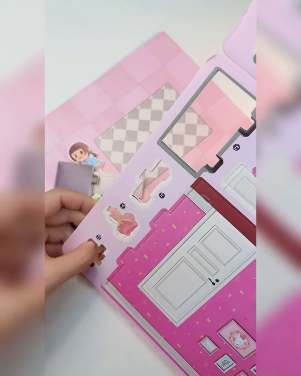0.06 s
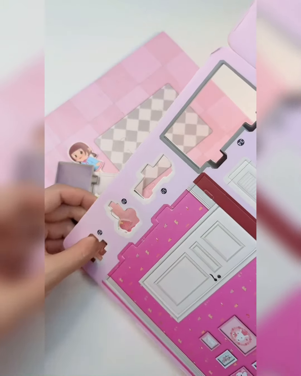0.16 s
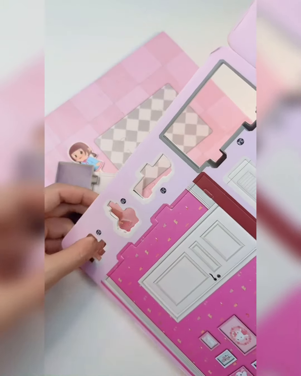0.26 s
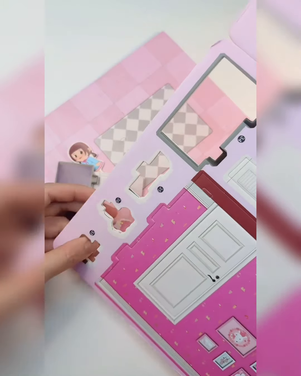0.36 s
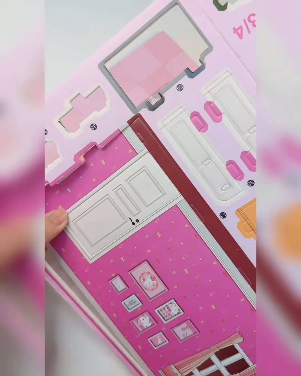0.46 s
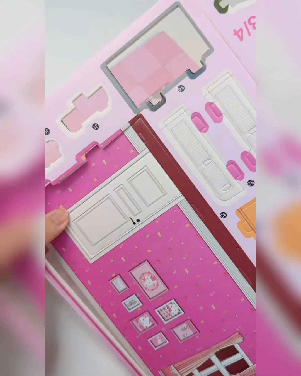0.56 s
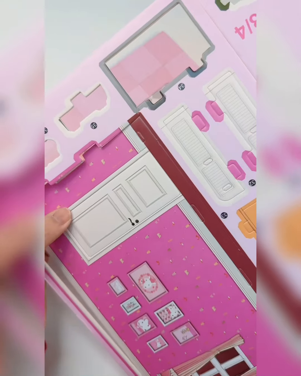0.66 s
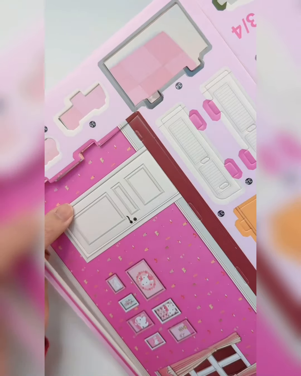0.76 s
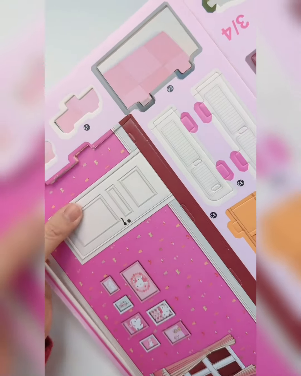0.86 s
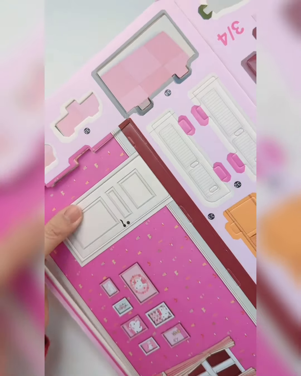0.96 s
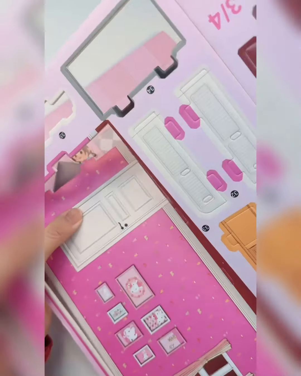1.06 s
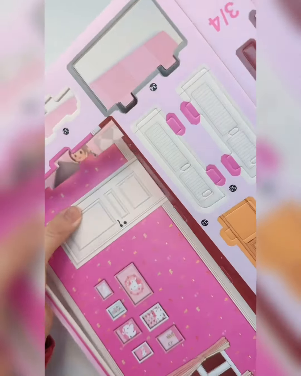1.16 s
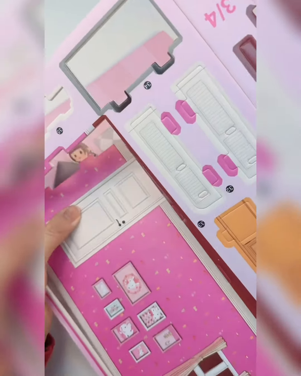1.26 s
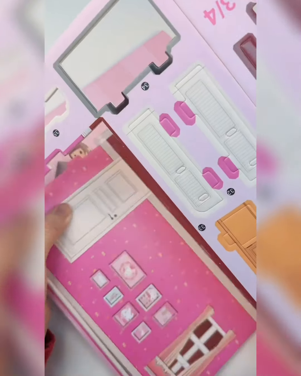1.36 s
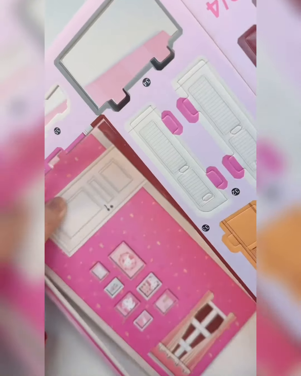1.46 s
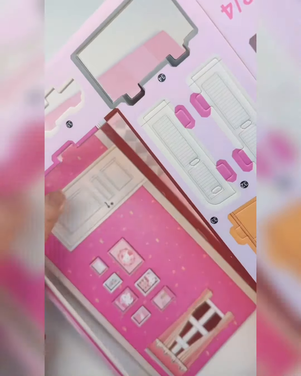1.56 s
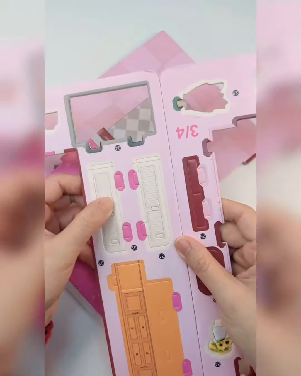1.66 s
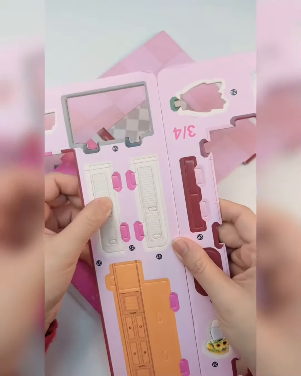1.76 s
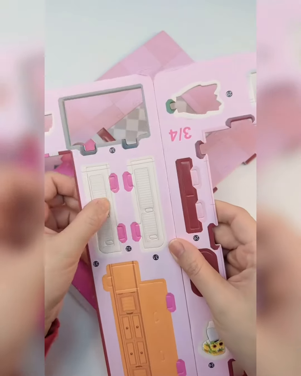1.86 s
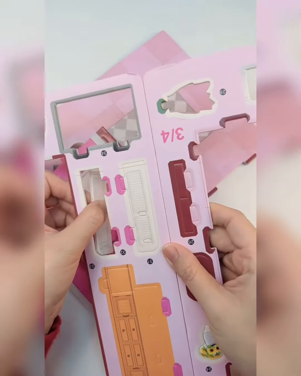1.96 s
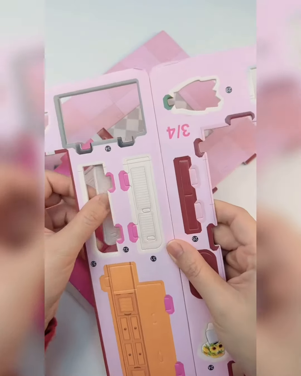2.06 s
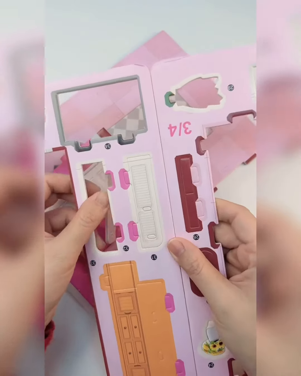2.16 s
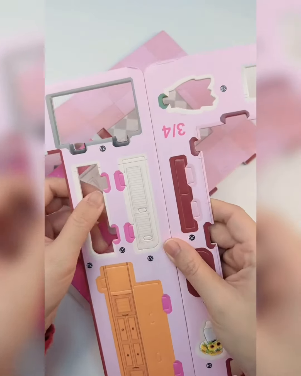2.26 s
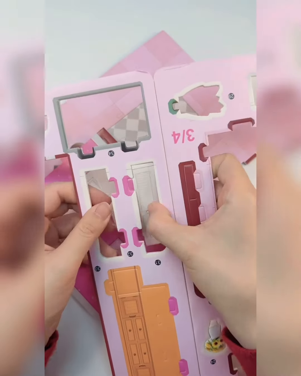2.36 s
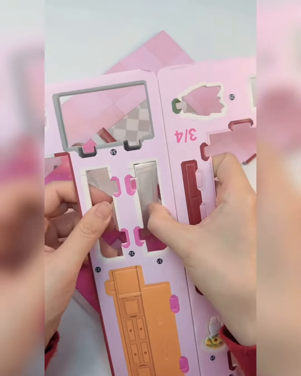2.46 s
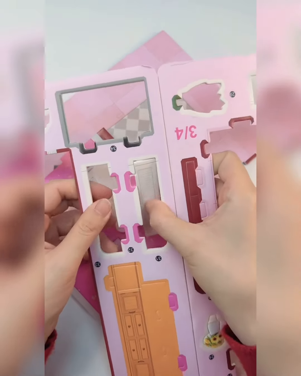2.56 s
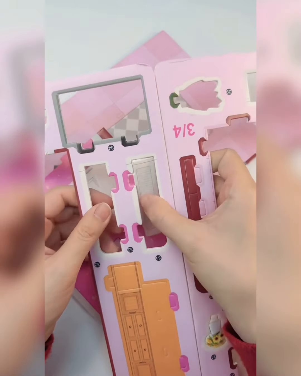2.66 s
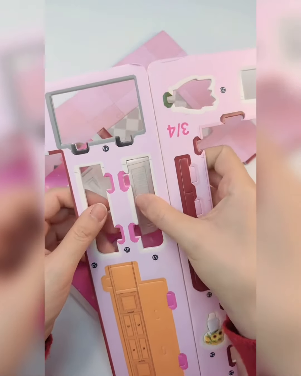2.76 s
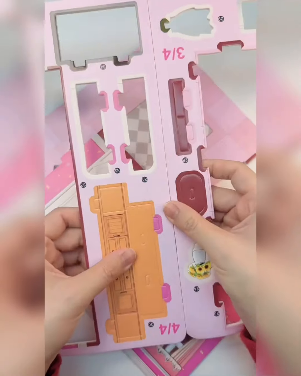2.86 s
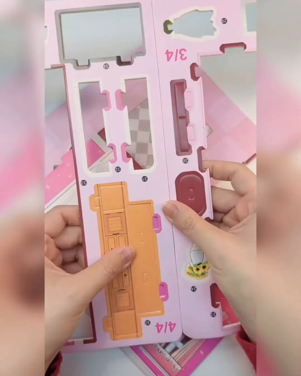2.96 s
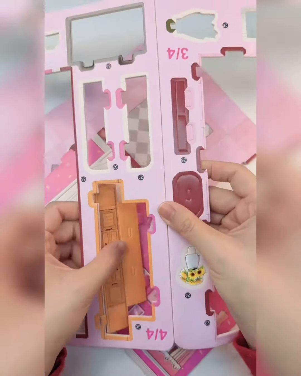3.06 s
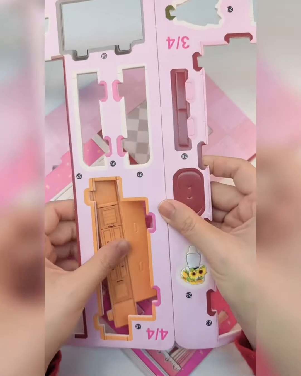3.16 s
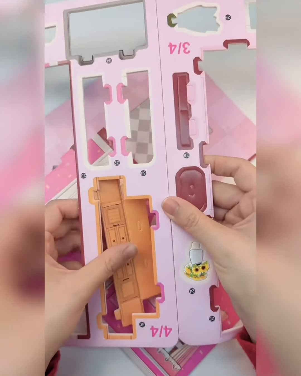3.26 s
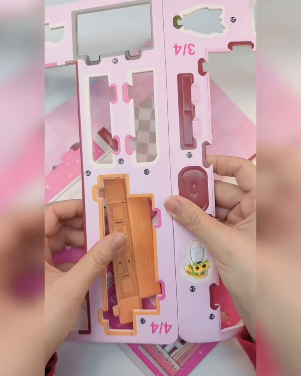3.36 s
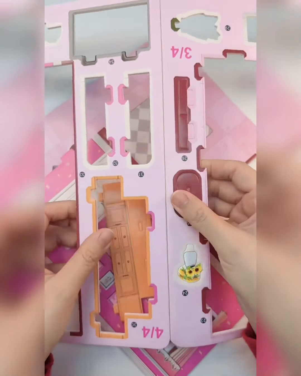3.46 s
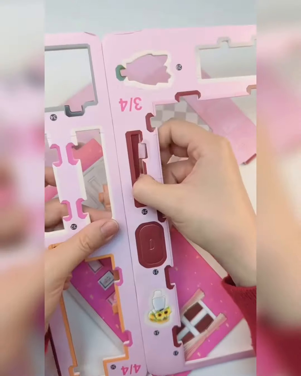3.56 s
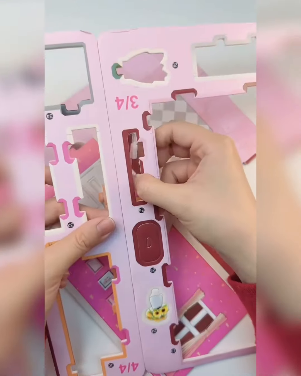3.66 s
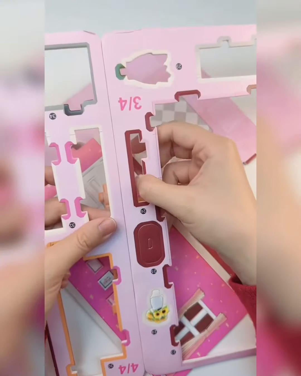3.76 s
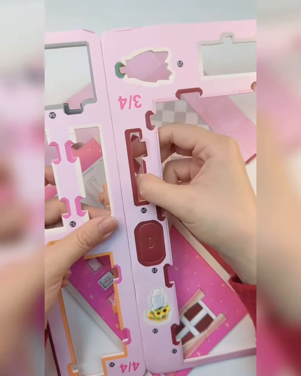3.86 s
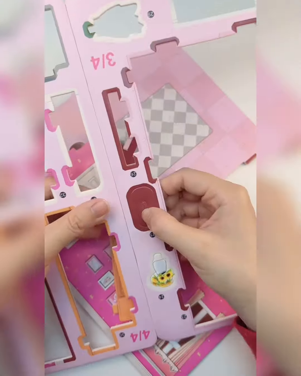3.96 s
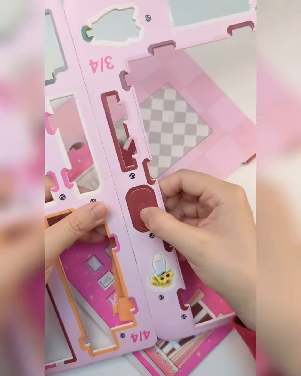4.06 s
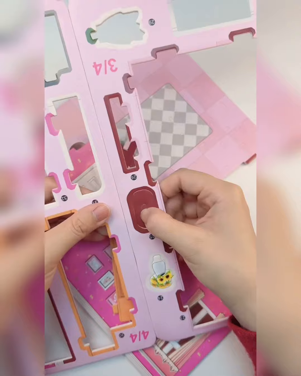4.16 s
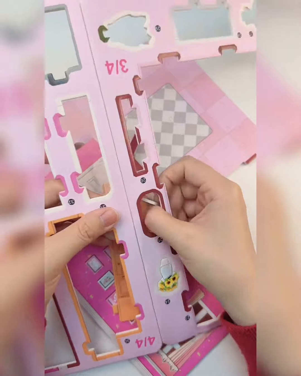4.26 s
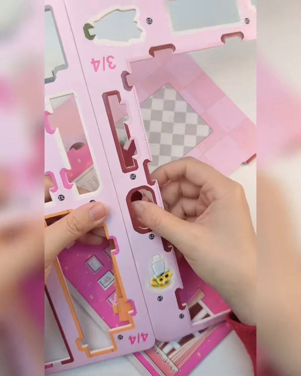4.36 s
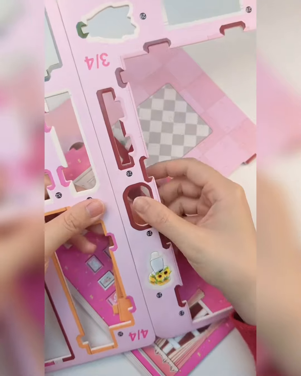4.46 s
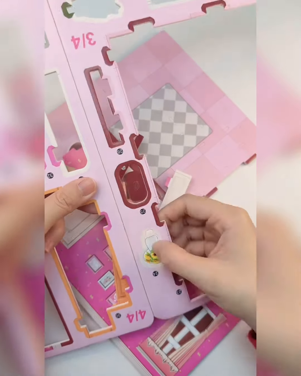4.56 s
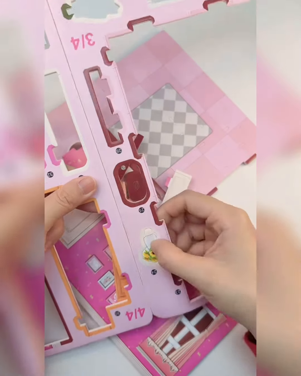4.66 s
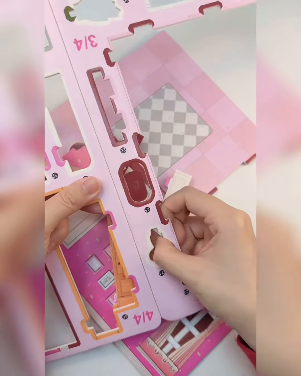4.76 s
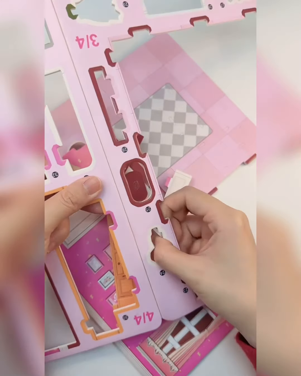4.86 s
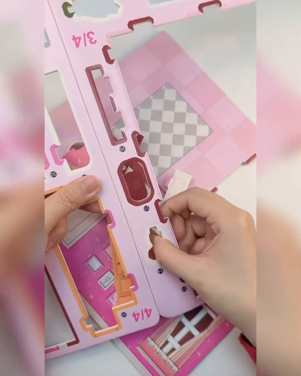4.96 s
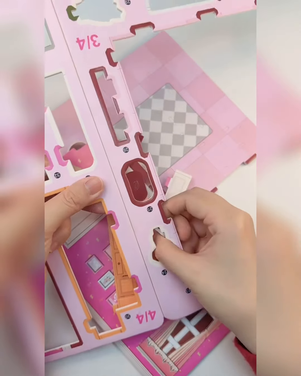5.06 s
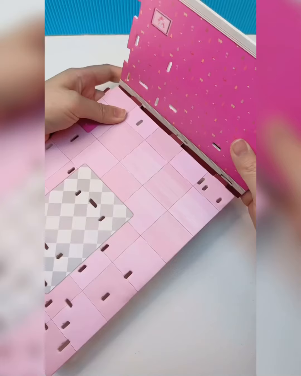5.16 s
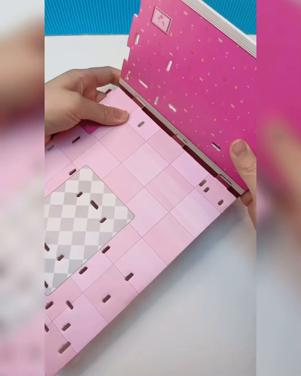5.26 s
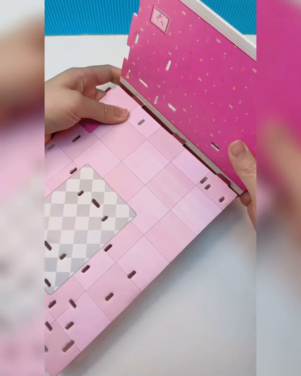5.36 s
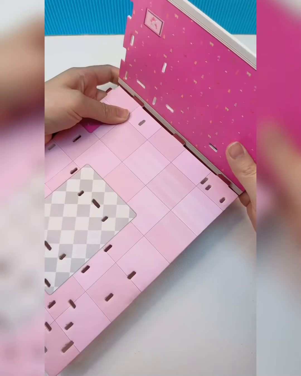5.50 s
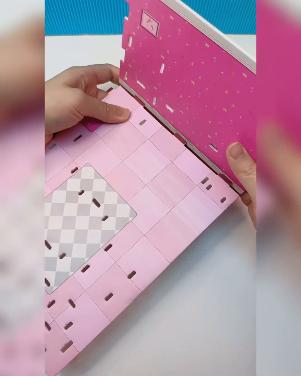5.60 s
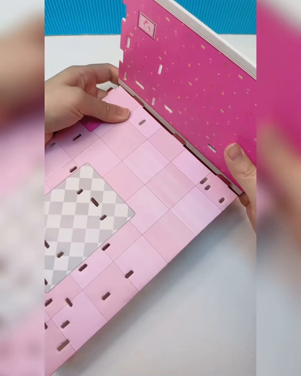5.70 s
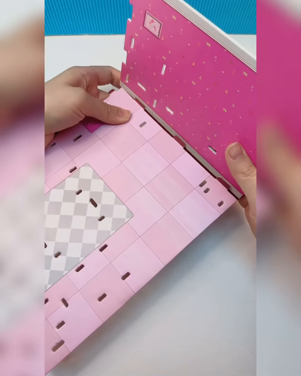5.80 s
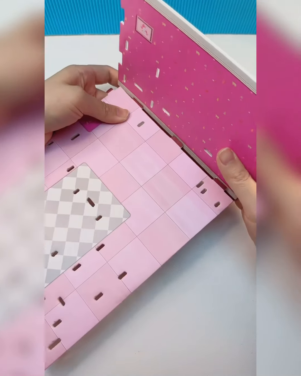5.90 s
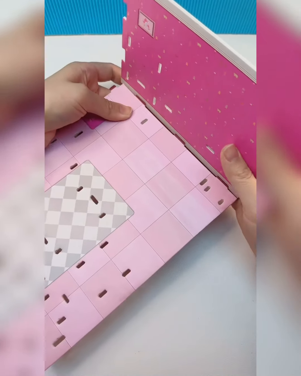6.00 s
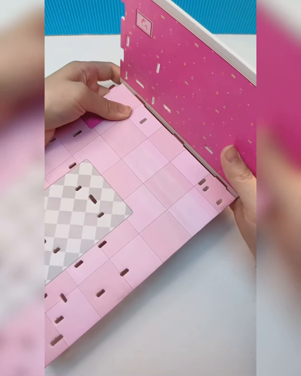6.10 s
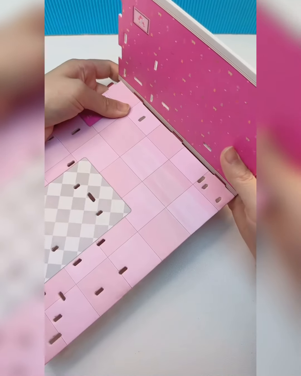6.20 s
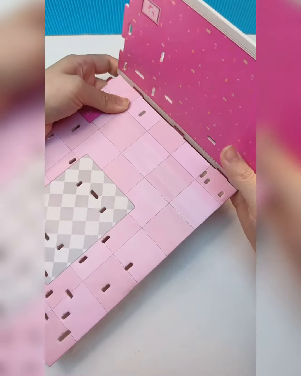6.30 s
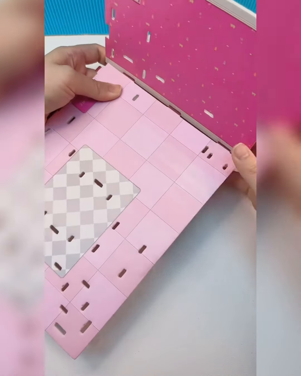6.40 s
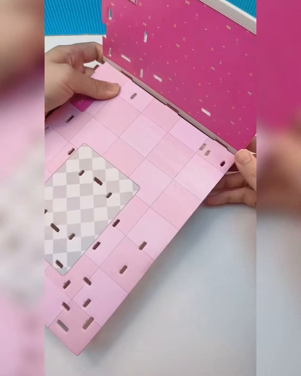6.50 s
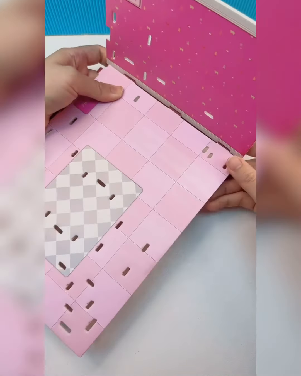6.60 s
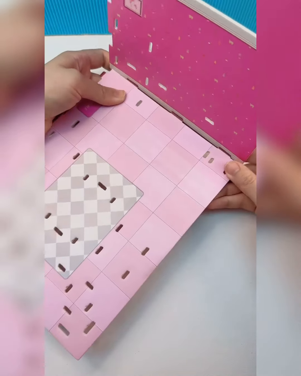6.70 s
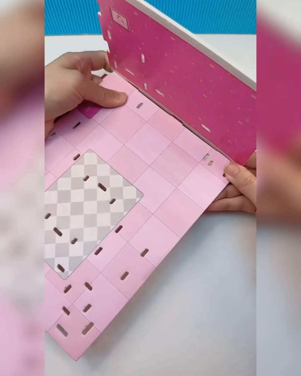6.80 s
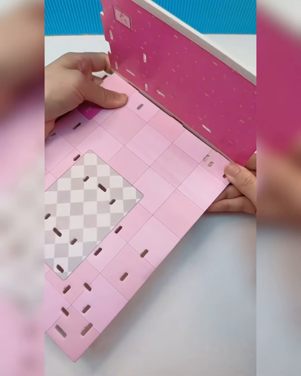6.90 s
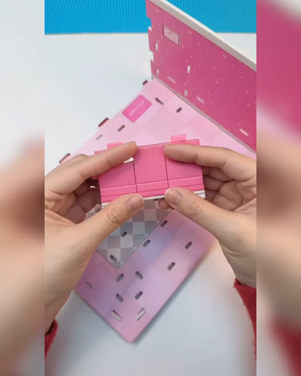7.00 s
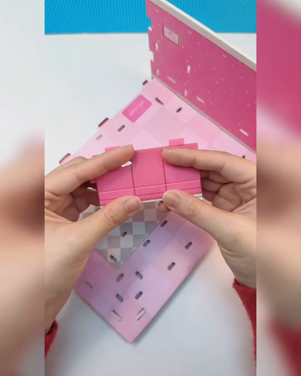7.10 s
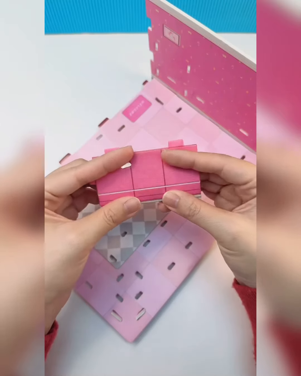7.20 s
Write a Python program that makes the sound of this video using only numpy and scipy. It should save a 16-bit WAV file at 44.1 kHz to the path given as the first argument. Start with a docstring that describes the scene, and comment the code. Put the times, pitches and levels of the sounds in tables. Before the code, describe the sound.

Close, dry paper snaps and knocks as thin card parts are punched free, followed by quieter scraping while two panels are fitted together.

```python
"""Punching out a cardboard kit

Over a table in a small room, close to one microphone, hands press die-cut pieces from thin card.
Paper bridges tear in clusters of snaps (fibre noise through the card's resonances), the sheet flexes
and slides (stick-slip noise), loose pieces drop (short knocks and low decaying swings).
Then the tabs of a wall scrape and click into a floor panel, over finger rub and a low room rumble."""
import sys
import numpy as np
from scipy import signal
from scipy.fft import rfft, irfft
from scipy.io import wavfile
from scipy.ndimage import uniform_filter1d

SR = 44100
rng = np.random.default_rng(int(sys.argv[2]) if len(sys.argv) > 2 else 0)


def log_audio(samples):
    """Write samples as a 16-bit WAV file to the path given in sys.argv[1]."""
    # one column per channel
    frames = np.atleast_2d(samples).T
    # limit to full scale, then quantise
    limited = np.clip(frames, -1, 1)
    pcm = np.round(limited * 32767).astype(np.int16)
    wavfile.write(sys.argv[1], SR, pcm)


N = 319284
TIME = np.arange(N) / SR


def from_db(db):
    """Decibels to gain."""
    return 10 ** (np.asarray(db) / 20)


def rms_one(x):
    """Scale to unit rms."""
    return x / np.sqrt(np.mean(x ** 2) + 1e-20)


def in_time(rows):
    """Each column of a curve, interpolated at every sample."""
    s, *columns = np.transpose(rows)
    return [np.interp(TIME, s, column) for column in columns]


def add(out, s, sound):
    """Mix a sound in, starting at time s; what falls outside the scene is left off."""
    at = int(round(s * SR))
    piece = sound[max(-at, 0):N - at]
    out[max(at, 0):max(at, 0) + len(piece)] += piece


def band_filter(low_hz, high_hz):
    """A Butterworth band-pass."""
    return signal.butter(3, [low_hz, high_hz], "band", fs=SR, output="sos")


def in_band(x, low_hz, high_hz):
    """One frequency range of a sound, at unit rms."""
    return rms_one(signal.sosfilt(band_filter(low_hz, high_hz), x))


def resonance(x, hz, width):
    """One two-pole resonance, gain about 1 on top."""
    r = np.exp(-np.pi * width / SR)
    numerator = np.array([1, 0, -1]) * (1 - r * r) / 2
    denominator = [1, -2 * r * np.cos(2 * np.pi * hz / SR), r * r]
    return signal.lfilter(numerator, denominator, x + 1e-18)


def resonances(x, modes):
    """Several resonances side by side, each at its own level."""
    return sum(from_db(db) * resonance(x, hz, width) for hz, width, db in modes)


def colour_response(points, size=2048):
    """Causal (minimum-phase) impulse response of a spectrum, by folding its cepstrum."""
    hz, db = np.transpose(points)
    grid = np.maximum(np.arange(size // 2 + 1) * SR / size, 1)
    gain = from_db(np.interp(np.log(grid), np.log(hz), db))
    cepstrum = irfft(np.log(gain))
    n = np.arange(size)
    fold = (n < size // 2) * np.minimum(n + 1, 2)
    return irfft(np.exp(rfft(cepstrum * fold)))


def through(x, response):
    """Pass a sound through an impulse response."""
    return signal.fftconvolve(x, response)[:len(x)]


def drift(per_s, count):
    """Random wander with unit rms."""
    steps = np.arange(count) * per_s / SR
    return rms_one(np.interp(steps, np.arange(count), rng.standard_normal(count)))


def fibres(count, grain_db):
    """Paper fibres letting go: dense tiny clicks of very uneven size."""
    sizes = from_db(grain_db * np.clip(rng.standard_normal(count), -2, 2))
    return rms_one(rng.standard_normal(count) * sizes)


def stick_slip(count, per_s, depth_db, uneven, jitter=.35):
    """Card catches and jumps unevenly: each jump starts sharply and dies away (negative depth: grows)."""
    jumps = np.cumsum(per_s * np.exp(jitter * drift(per_s, count))) / SR
    sizes = rng.uniform(-1.4, 1, count)[jumps.astype(int)]
    return from_db(depth_db * (uneven * sizes - jumps % 1))


# The colour of tearing card. Each row: frequency in Hz, level in dB.
SNAP_COLOUR = [(200, -7.5), (500, -7.5), (900, 0), (1500, 3), (2800, -3.5), (3300, -3.5), (4200, -4.5),
               (5500, -12.5), (7200, -11.5), (9500, -8.5), (12500, -10), (15500, -1.5)]
# A snap's flex, board, edge and fibre crack. Each row: low end in Hz, high end in Hz.
SNAP_BANDS = [(210, 789), (760, 2378), (2200, 6960), (8400, 15800)]


def snap_voice():
    """What all snaps share: the colour of the card and the filters of its four ranges."""
    return colour_response(SNAP_COLOUR), [band_filter(low, high) for low, high in SNAP_BANDS]


SNAP_LEAD_S = .01   # room for the strain to build before a snap
# a smaller piece rings higher, flexes less and sounds more from its edge
MIDDLE_RING_HZ, FLEX_DB_PER_OCTAVE, EDGE_DB_PER_OCTAVE = 1160, -12.5, 6
SECOND_MODE_RATIO, SECOND_MODE_DB = 2.1, -13   # the piece's second mode against its first


def snap(voice, hz, db, flex_db, edge_db, crack_db, strain_db, ring_db, tear_s=0.0021, size=2048):
    """The first fibres give under strain, then the card lets go; the piece rings briefly and flutters."""
    strain_s, flutter_s, flutter_db, ring_width_hz = 0.0022, 0.012, -18, 300
    colour, bands = voice
    rise_s = .27 * tear_s
    t = np.arange(size) / SR - SNAP_LEAD_S - rise_s
    before, after = np.maximum(-t, 0), np.maximum(t, 0)
    crackle = rms_one(stick_slip(size, per_s=330, depth_db=10.5, uneven=0.16))
    force = np.exp(-before / rise_s - after / tear_s)
    force = force + from_db(flutter_db) * crackle * np.exp(-before / rise_s - after / flutter_s)
    force = force + from_db(strain_db) * np.exp(-before / strain_s - after / tear_s)
    tear = through(force * fibres(size, grain_db=2.5), colour)
    first_mode = resonance(tear, hz, ring_width_hz)
    second_mode = from_db(SECOND_MODE_DB) * resonance(tear, SECOND_MODE_RATIO * hz, ring_width_hz)
    piece = tear + from_db(ring_db) * (first_mode + second_mode)
    octaves = np.log2(hz / MIDDLE_RING_HZ)
    flex = flex_db + FLEX_DB_PER_OCTAVE * octaves
    edge = edge_db + EDGE_DB_PER_OCTAVE * octaves
    gains = from_db(db + np.array([flex, 0, edge, crack_db]))
    span = np.sqrt(.01 * SR / size)   # each range's energy is referred to 10 ms
    return span * sum(g * rms_one(signal.sosfilt(band, piece)) for g, band in zip(gains, bands))


# Paper bridges. Each row: start in seconds, ring of the piece in Hz, level in dB before the trim,
# fibre crack against that level in dB before its trim, tearing time in seconds.
TEARS = [(0.0005, 3020, -22.5, 0.5, 0.0027), (0.0216, 1790, -34, 8.5, 0.0012),
         (1.0244, 1220, -25, -3.5, 0.0025), (1.374, 1550, -25.5, -17, 0.00064),
         (1.918, 1800, -24.5, -10, 0.0017), (1.9322, 1560, -19, -10.5, 0.001),
         (1.944, 1190, -20, -4.5, 0.001), (1.9481, 1230, -17, -8, 0.0011), (2.301, 1600, -18.5, -5, 0.0027),
         (2.3345, 920, -18.5, -10, 0.00066), (2.3491, 1140, -31, -2, .001), (2.356, 1660, -20, 0.5, .0023),
         (2.3827, 2850, -21.5, -4, 0.0019), (2.8849, 1203, -39.5, -7, 0.0011),
         (2.8886, 1200, -27.5, -11.5, 0.0017), (2.912, 1290, -26, -3, .0013),
         (2.919, 1600, -30, -7, 0.0017), (2.941, 1220, -24.5, -4, 0.002), (2.9478, 1480, -30, -11, 0.002),
         (3.0093, 1370, -23, -3.5, 0.0026), (3.012, 1270, -14.5, -19, 0.0014),
         (3.0186, 2290, -20, -11, 0.00077), (3.022, 1300, -19.5, -4.5, 0.0014),
         (3.0366, 1220, -29.5, -10, 0.002), (3.0441, 2204, -18, -6.5, 0.001),
         (3.5163, 1470, -28, 5, 0.00084), (3.535, 1450, -20.5, -5, 0.00071),
         (3.5502, 1430, -30.5, 5, 0.00049), (3.5599, 1390, -34.5, -5, 0.00068),
         (4.1962, 2060, -20.5, -11.5, 0.0017), (4.2033, 1380, -21.5, 0, 0.00088),
         (4.233, 1850, -22, 4, 0.0016), (4.246, 1750, -30, -13, 0.006), (4.71, 2480, -22.5, -0.5, 0.0035),
         (4.7178, 2630, -23.5, -2.5, 0.00031), (4.7242, 1940, -25, -4, 0.0019),
         (4.746, 1020, -31.5, 5, 0.0014)]
# The big wall flexes the sheet most, the small parts least. Each row: time in seconds,
# flex against the level in dB, top pitch of the recoil in Hz before it is drawn lower.
SHEET_FLEX = [(1.2, -1, 149), (1.93, -6.5, 160), (2.3, -9, 390), (2.4, -8.5, 393), (3.0, -13.5, 160),
              (3.53, -6, 260), (4.2, -16.5, 180), (4.7, -7.5, 170)]
EDGE_FOLLOWS_CRACK = 0.25   # a sharper tear is also louder at the edge: dB per dB


def tears(level_db=-2.0, edge_db=-5.5, fibre_db=1.5):
    """Each bridge breaks with a snap: short and hard, or drawn out into a brief rip."""
    out, voice = np.zeros(N), snap_voice()
    when, flexes, _ = np.transpose(SHEET_FLEX)
    for s, hz, db, crack, tear_s in TEARS:
        flex = np.interp(s, when, flexes)
        edge = edge_db + EDGE_FOLLOWS_CRACK * crack
        sound = snap(voice, hz, db + level_db, flex, edge, crack + fibre_db,
                     strain_db=-22.5, ring_db=7.0, tear_s=tear_s)
        add(out, s - SNAP_LEAD_S, sound)
    return out


def taps(table, level_db, **balance):
    """Single contacts of one kind, as snaps sharing one base balance of flex, edge and crack."""
    out, voice = np.zeros(N), snap_voice()
    for s, hz, db in table:
        add(out, s - SNAP_LEAD_S, snap(voice, hz, db + level_db, **balance))
    return out


# Card against card. Each row: start in seconds, ring of the piece in Hz, level in dB before the trim.
KNOCKS = [(0.3962, 1070, -50.5), (0.8872, 815, -44), (1.4061, 1410, -33), (1.6812, 1140, -48),
          (1.843, 1260, -38), (2.1333, 730, -48.5), (1.9655, 1130, -30), (2.3133, 1400, -33),
          (2.362, 880, -29), (2.5694, 1120, -47.5), (2.738, 1050, -38), (2.7809, 840, -49.5),
          (3.0593, 880, -31.5), (3.078, 945, -34.5), (3.2975, 1530, -34.5), (3.3705, 2350, -48),
          (3.741, 2180, -32), (3.8184, 2330, -29), (3.827, 1940, -33.5), (4.3474, 1140, -44.5),
          (4.411, 2190, -27.5), (4.592, 1950, -45.5), (4.598, 3300, -52), (6.374, 2500, -51.5),
          (6.392, 1950, -54), (6.635, 1300, -53), (6.815, 1106, -59), (6.869, 1160, -51),
          (6.891, 1100, -53.5)]


def knocks():
    """Card knocks against card: mostly the ring of the piece, with little strain or crack."""
    return taps(KNOCKS, level_db=-1.5, flex_db=-9.0, edge_db=-8.0, crack_db=-14.5,
                strain_db=-37, ring_db=11.5)


# Catching edges and tabs. Each row: start in seconds, ring of the piece in Hz,
# level in dB before the trim.
CLICKS = [(0.2463, 3620, -50.5), (0.2546, 3700, -45), (0.3048, 3410, -54.5), (0.341, 3040, -57.5),
          (0.9762, 2250, -42), (1.8505, 1130, -37), (2.0515, 3040, -46), (2.8506, 1150, -50.5),
          (4.06, 1100, -52), (4.1852, 1108, -40), (5.47, 2020, -59.5), (5.566, 1500, -54.5),
          (5.647, 2510, -51.5), (5.751, 2970, -46), (5.771, 2400, -57), (6.0548, 3000, -48.5),
          (6.096, 1130, -36.5), (6.1125, 1140, -40.5), (6.124, 1300, -53), (6.2446, 3400, -51),
          (6.258, 3440, -49), (6.292, 1120, -44), (6.4752, 2780, -47.5), (6.531, 2560, -49.5),
          (6.543, 1700, -49.5), (6.598, 2700, -48.5), (6.607, 1260, -43), (6.621, 1500, -56),
          (6.714, 1960, -54), (6.7537, 3000, -52), (6.7771, 1270, -47), (6.869, 2400, -54),
          (7.1802, 3135, -51.5)]


def clicks():
    """A cut edge or a tab catches and lets go: mostly fibre crack and edge, with a weak ring."""
    return taps(CLICKS, level_db=-4.5, flex_db=-12.0, edge_db=-3.0, crack_db=4.0,
                strain_db=-22.5, ring_db=2.0)


def strokes(table, points, slips_per_s, uneven, swell_db, grain_db, rise_s, fall_s, board_db, hiss_db):
    """Card rubs on card: it sticks and slips, and the slips modulate a rush of fibre clicks."""
    out, colour, lead = np.zeros(N), colour_response(points), .05
    t = TIME[:SR // 2] - lead
    for start, end, body, hiss, stick in table:
        length = end - start
        pressure = np.exp(np.minimum(t / rise_s, 0) - np.maximum(t - length, 0) / fall_s)
        arch = np.sin(np.pi * np.clip(t / length, 0, 1))
        pressure = pressure * from_db(swell_db * (arch - 1.0))
        slips = stick_slip(len(t), slips_per_s, stick, uneven)
        rub = through(fibres(len(t), grain_db) * slips, colour)
        low = from_db(body + board_db) * in_band(rub, 280, 2800)
        high = from_db(hiss + hiss_db) * in_band(rub, 4100, 14000)
        add(out, start - lead, pressure * (low + high))
    return out


# The loose sheet slides. Each row: start in seconds, end in seconds, level in dB before the trims.
SLIDES = [(0.021, 0.061, -46), (0.506, 0.513, -26.5), (0.892, 0.904, -49.5), (0.957, 0.963, -41.5),
          (1.027, 1.023, -32.5), (1.384, 1.402, -40.5), (1.965, 1.996, -43.5), (3.661, 3.672, -43.5),
          (3.888, 3.89, -42), (3.93, 3.932, -52), (4.762, 4.795, -47.5), (6.431, 6.445, -45)]
# The colour of the sliding sheet. Each row: frequency in Hz, level in dB.
SLIDE_COLOUR = [(200, -24), (400, -10), (650, -14.5), (900, -0.5), (1400, -3), (2100, -2.5), (4000, -9.5),
                (7000, -15.5), (10000, -13.5), (15500, -8)]
SLIDE_HISS_DB, SLIDE_STICK_DB = 3, 2.5   # hiss against the level before the trims; stick-slip depth


def slides():
    """The sheet slides with shallow, rapid stick and slip."""
    rows = [(start, end, db, db + SLIDE_HISS_DB, SLIDE_STICK_DB) for start, end, db in SLIDES]
    return strokes(rows, SLIDE_COLOUR, slips_per_s=390, uneven=.25, swell_db=-0.4, grain_db=3.0,
                   rise_s=0.0065, fall_s=0.011, board_db=-4.0, hiss_db=-5.0)


# A tab rubs in its slot. Each row: start in seconds, end in seconds, level in dB before the trims,
# depth of the stick and slip in dB.
SCRAPES = [(5.371, 5.429, -46.5, 9.5), (5.585, 5.632, -43, 0), (5.65, 5.731, -40.5, -5),
           (5.78, 5.8, -47, 13), (5.867, 5.931, -39.5, 11), (5.94, 6.048, -39.5, 19),
           (6.108, 6.132, -43.5, 5), (6.243, 6.26, -40.5, 19), (6.53, 6.547, -46.5, 17),
           (6.6, 6.606, -39, 12), (6.615, 6.724, -47.5, 19), (6.774, 6.814, -49.5, 13)]
# The colour of the scraping tab. Each row: frequency in Hz, level in dB.
SCRAPE_COLOUR = [(210, -32), (350, 3.5), (504, 5), (738, -4.5), (880, 5.5), (1480, 5.5), (2350, 0),
                 (2800, 0), (4870, -17), (5800, -12), (6380, -19), (15500, -17)]
# a harder push is brighter: before the trims the hiss equals the level at a full push
# and grows faster than it (dB per dB)
FULL_PUSH_DB, SCRAPE_HISS_GROWTH = -37, 2.53


def scrapes():
    """A tab pushed into its slot scrapes with slower stick and slip, brighter when pushed harder."""
    rows = []
    for start, end, db, stick in SCRAPES:
        hiss = FULL_PUSH_DB + SCRAPE_HISS_GROWTH * (db - FULL_PUSH_DB)
        rows.append((start, end, db, hiss, stick))
    return strokes(rows, SCRAPE_COLOUR, slips_per_s=160, uneven=0.16, swell_db=0, grain_db=2.5,
                   rise_s=0.0037, fall_s=0.0039, board_db=-10.5, hiss_db=-1)


# Bending modes of the sheet. Each row: frequency in Hz, width in Hz, level in dB.
SHEET_MODES = [(394, 37, 7.5), (475, 65, 2), (601, 31, 5.5), (882, 70, 2.5), (1050, 120, -9),
               (1140, 130, -0.5), (1247, 40, -6), (1390, 30, -11.5), (2130, 28, -15), (2450, 16, -9),
               (2740, 190, -5)]
# Bending modes of the floor panel. Each row: frequency in Hz, width in Hz, level in dB.
PANEL_MODES = [(431, 12, 3), (505, 100, 4.5), (1010, 55, -2), (1170, 96, 1), (2610, 200, -22)]


def board(x, modes):
    """The card's bending modes ring along with whatever excites it."""
    return x + resonances(x, modes)


# The free length of a tab rings, its pitch sliding as it enters the slot. Each row: start in seconds,
# end in seconds, first pitch in Hz, last pitch in Hz, level in dB.
TAB_GLIDES = [(5.642, 5.735, 1500, 2000, -48.5), (5.865, 6, 2960, 2600, -53), (5.91, 5.94, 1050, 1300, -44),
              (6.01, 6.048, 1500, 1400, -47), (6.23, 6.268, 3600, 3400, -52)]


def tab_glides(width_hz=180):
    """Sticking and slipping drives one resonance of the tab, which slides in pitch during the push."""
    out, t, r = np.zeros(N), TIME[:SR // 4], np.exp(-np.pi * width_hz / SR)
    for start, end, first_hz, last_hz, db in TAB_GLIDES:
        progress = np.clip(t / (end - start), 0, 1)
        pitch = first_hz + (last_hz - first_hz) * progress
        turn = np.exp(2j * np.pi * np.cumsum(pitch) / SR)
        slips = fibres(len(t), grain_db=5) * stick_slip(len(t), per_s=160, depth_db=21, uneven=.25)
        # turned down to zero frequency, smoothed there, and turned back up
        ring = np.real(turn * signal.lfilter([1], [1, -r], slips / turn))
        swell = np.sqrt(np.abs(np.sin(np.pi * progress)))
        add(out, start, from_db(db) * swell * rms_one(ring))
    return out


# A dragging finger or edge chafes one resonance. Each row: middle in seconds,
# half length in seconds, frequency in Hz, level in dB before the trim.
CHAFES = [(0.257, 0.001, 3680, -25), (0.51, 0.01, 840, -25.5), (0.51, 0.01, 1000, -30),
          (0.52, 0.01, 1400, -34), (0.517, 0.012, 15000, -38), (1.02, 0.0037, 16000, -29),
          (1.35, 0.0094, 17600, -32), (0.85, 0.016, 9400, -50), (2.68, 0.018, 11500, -55),
          (1.02, 0.0061, 940, -33), (1.13, 0.0046, 1080, -37.5), (1.276, 0.014, 1000, -48.5),
          (1.4, 0.0057, 2400, -43), (1.399, 0.016, 1210, -29), (6.1, 0.004, 1400, -47),
          (6.44, 0.0061, 1560, -49), (6.683, 0.038, 475, -51), (6.799, 0.017, 410, -55),
          (7.177, 0.009, 3600, -51.5)]


def chafes(sharpness=7, level_db=-1):
    """Friction feeds a single resonance, here two equal filters in a row: a short hollow rub."""
    out, t = np.zeros(N), TIME[:SR] - .5
    for s, half_length, hz, db in CHAFES:
        width = 2 * hz / sharpness
        tone = resonance(resonance(fibres(SR, grain_db=5.5), hz, width), hz, width)
        swell = np.exp(-(t / half_length) ** 2 / 2)
        add(out, s - .5, from_db(db + level_db) * swell * rms_one(tone))
    return out


# A small piece is dragged out along its cut edge. Each row: time in seconds, level in dB.
DRAG_LEVEL = [(4.6, -95), (4.645, -61), (4.78, -50), (4.83, -70), (4.89, -52.5), (4.94, -66), (4.99, -67),
              (5.058, -54.5), (5.08, -95)]
# The dragged edge's resonances. Each row: frequency in Hz, width in Hz, level in dB.
DRAG_MODES = [(958, 300, -1.5), (2580, 500, 12), (3550, 340, -9)]


def drags():
    """A cut edge rasps along the side of its hole and keeps its own resonances going."""
    rasp = fibres(N, grain_db=9) * stick_slip(N, per_s=140, depth_db=9.5, uneven=0.5)
    return from_db(in_time(DRAG_LEVEL)[0]) * rms_one(resonances(rasp, DRAG_MODES))


def sheet_recoils():
    """After each tear the sheet springs back: rows in the form of the thumps."""
    recoil_db, swell_s, t60_s = -16.5, 0.0014, .045
    when, flex, pitch = np.transpose(SHEET_FLEX)
    rows = []
    for s, _, db, _, _ in TEARS:
        hz = np.interp(s, when, pitch) * rng.uniform(0.8, 0.87)
        rows.append((s, hz, db + recoil_db + np.interp(s, when, flex), swell_s, t60_s))
    return rows


# A whole panel swings or lands and pushes air. Each row: start in seconds, frequency in Hz,
# level in dB before the trim, swell in seconds, time to fall 60 dB in seconds.
THUMPS = [(0.516, 286, -33.5, 0.0031, 0.087), (0.518, 113, -12.5, 0.014, 0.073),
          (0.888, 107, -45.5, .002, 0.056), (1.029, 423, -23, 0.00073, .02), (1.028, 133, -36, .002, 0.067),
          (1.376, 423, -13.5, 0.00062, 0.013), (1.377, 264, -25.5, 0.00076, 0.028),
          (1.377, 130, -30.5, .001, 0.076), (1.404, 183, -30, .001, 0.042), (1.411, 69, -33, 0.0017, 0.075),
          (1.957, 192.7, -29, 0.00076, .04), (2.356, 397, -17.5, 0.0015, 0.033),
          (2.782, 180, -42, 0.0014, 0.041), (3.063, 128, -40, 0.0024, .06), (4.234, 200, -41.5, .001, .05),
          (5.876, 85.3, -43, .006, .12), (5.925, 110, -48, .004, 0.097), (6.699, 214, -44, 0.0009, 0.031),
          (6.785, 412, -43, .002, 0.042), (6.869, 417, -44, 0.0012, 0.036), (6.89, 330, -40.5, .001, 0.024)]


def thumps(level_db=5.5):
    """A wide panel swings a few times and pushes the air under it; so does the sheet after each tear."""
    out, t = np.zeros(N), TIME[:SR // 2]
    for s, hz, db, swell_s, t60 in THUMPS + sheet_recoils():
        fade = np.exp(-np.log(1000) * t / t60) * (1 - np.exp(-(t / swell_s) ** 2))
        add(out, s, from_db(db + level_db) * fade * np.sin(2 * np.pi * hz * t))
    return out


FLICK_S, FLICK_DB = 0.001, -41   # a loose piece is flicked and rings on
# Its ringing. Each row: frequency in Hz, level against the flick in dB,
# time to fall 60 dB in seconds.
FLICK_MODES = [(472, -9.5, 0.16), (794, -7, 0.36), (1130, -13.5, 0.13), (1404, -19.5, 0.42),
               (1730, 0.5, 0.22), (2190, -13.5, .3), (2520, 2.5, 0.16), (3120, -5.5, .13)]


def flick():
    """The flicked piece's modes start together and die away, each at its own rate."""
    out, t = np.zeros(N), TIME[:SR // 2]
    for hz, db, t60 in FLICK_MODES:
        add(out, FLICK_S, from_db(FLICK_DB + db - 60 * t / t60) * np.sin(2 * np.pi * hz * t))
    return out


def swells(table):
    """Smooth swells of level, one for each row."""
    return sum(from_db(db) * np.exp(-((TIME - s) / half_length) ** 2 / 2) for s, half_length, db in table)


# A finger shifts its grip. Each row: middle in seconds, half length in seconds,
# level in dB before the trims.
BRUSHES = [(0.405, 0.029, -59.5), (0.834, 0.035, -53), (1.628, 0.026, -56.5), (2.707, 0.069, -56),
           (3.345, 0.027, -47.5), (4.677, 0.032, -52), (4.89, 0.039, -55), (5.045, 0.017, -49),
           (6.21, 0.023, -50.5), (7.19, 0.039, -66.5)]
# How firmly the fingers hold the card, as the level of their rubbing. Each row: time in seconds,
# level in dB, hiss against that level in dB.
HOLD = [(0.2, -65.5, -4), (1.3, -65.5, -4), (2.5, -57, -5), (4.1, -62.5, -5.5), (5.0, -63.5, -1),
        (5.1, -69.5, -6), (5.3, -64, -8.5), (5.5, -62.5, -12), (6.4, -60.5, -7), (6.9, -62, -5),
        (7.06, -71.5, 1.5)]
# The colour of skin on card. Each row: frequency in Hz, level in dB.
FINGER_COLOUR = [(180, -34.5), (300, -11.5), (641, -14), (892, -5.5), (1140, -7), (1560, -8.5),
                 (1670, -13.5), (1810, -11.5), (2830, -13.5), (3510, -11.5), (7020, -21), (10300, -17),
                 (15500, -18.5)]


def fingers(board_db=-1, hiss_db=-2, rough_db=3.5):
    """Skin brushes the print with an uneven grip, swelling each time a finger shifts."""
    shifting = swells(BRUSHES)
    grip = from_db(rough_db * (drift(25, N) + drift(200, N)))
    rub = through(fibres(N, grain_db=6.0) * grip, colour_response(FINGER_COLOUR))
    low = in_band(rub, 320, 4400)
    high = in_band(rub, 2800, .45 * SR)
    holding, hiss = from_db(in_time(HOLD))
    low_level = np.hypot(holding, from_db(board_db) * shifting)
    high_level = np.hypot(hiss * holding, from_db(hiss_db) * shifting)
    return low_level * low + high_level * high


# Room tail. Each row: low end in Hz, high end in Hz, level in dB, time to fall 60 dB in seconds.
ROOM = [(152, 567, -24.5, 0.18), (620, 1610, -29, 0.26), (1670, 4000, -29.5, 0.37),
        (4400, 11000, -21.5, 0.34), (7700, 13000, -24, 0.2)]


def room(x, onset_s=0.0007, table_db=-13, table_s=0.0015):
    """Quick scatter from table and hands, then a short diffuse tail, both of shaped noise."""
    t = TIME[:SR // 2]
    scatter = rng.standard_normal(len(t)) * (t / table_s) * np.exp(-t / table_s)
    response = from_db(table_db) * rms_one(scatter)
    for low, high, db, t60 in ROOM:
        fade = np.exp(-np.log(1000) * t / t60) * (1 - np.exp(-(t / onset_s) ** 2))
        noise = signal.sosfilt(band_filter(low, high), rng.standard_normal(len(t)))
        response = response + from_db(db) * rms_one(noise * fade)
    return x + through(x, response / np.sqrt(len(t)))   # levels become total energies


# The colour of the low murmur. Each row: frequency in Hz, level in dB.
RUMBLE = [(25, -29), (40, -15), (56, -1.5), (80, -6), (108, -5), (150, -15.5), (310, -16), (420, -32.5),
          (700, -24)]
# The course of the rumble. Each row: time in seconds, level in dB before the trim.
RUMBLE_LEVEL = [(0, -62), (2.5, -57.5), (3.3, -54.5), (4.5, -58.5), (5.5, -61), (5.95, -58.5), (6.9, -57),
                (7.0, -67)]
# The room's air hums at its lowest resonances. Each row: frequency in Hz, width in Hz, level in dB.
HUM_MODES = [(54, 4.6, 6), (103.8, 7.1, -0.5)]


def rumble(level_db=2):
    """The low murmur of the room's air: coloured noise that also feeds its hum resonances."""
    air = through(rng.standard_normal(N), colour_response(RUMBLE, size=16384))
    air = air + resonances(air, HUM_MODES)
    return from_db(in_time(RUMBLE_LEVEL)[0] + level_db) * in_band(air, 48, 610)


def scene():
    """Punching out, then slotting together, close to one microphone."""
    sheet = board(tears() + knocks() + clicks() + slides(), SHEET_MODES)
    panel = board(scrapes(), PANEL_MODES)
    card = sheet + panel + tab_glides() + chafes() + drags() + thumps() + flick()
    return (room(card) + fingers() + rumble())[None]


# The level dips briefly. Each row: start in seconds, end in seconds.
DIPS = [(0.359, 0.387), (2.226, 2.236), (2.765, 2.778), (3.439, 3.447), (3.86, 3.872), (4.453, 4.466),
        (5.062, 5.088), (6.925, 6.953)]
DIP_DB, CUTOFF_HZ = -26, 15450


def record(dry, ceiling=0.7):
    """The sharpest peaks are rounded, the level dips briefly a few times, the top is cut."""
    rounded = ceiling * np.tanh(dry / ceiling)
    dip_db = sum(DIP_DB * ((TIME > start) & (TIME < end)) for start, end in DIPS)
    dipped = rounded * from_db(uniform_filter1d(dip_db.astype(float), size=200))
    return signal.sosfilt(signal.ellip(10, .2, 80, CUTOFF_HZ, fs=SR, output="sos"), dipped)


dry = scene()
out = record(dry)
log_audio(out)
```